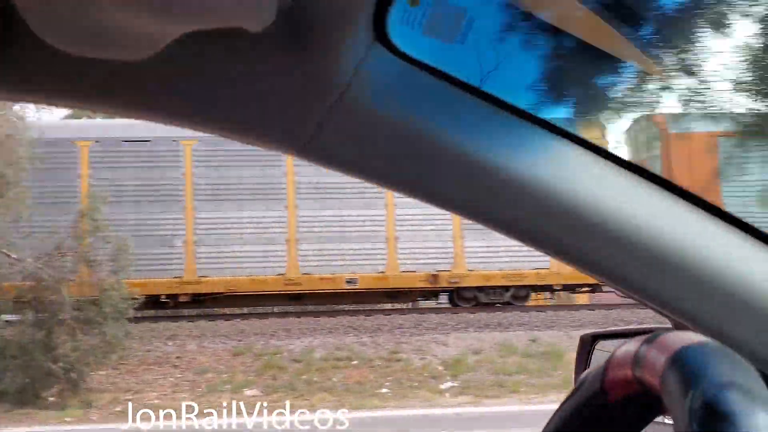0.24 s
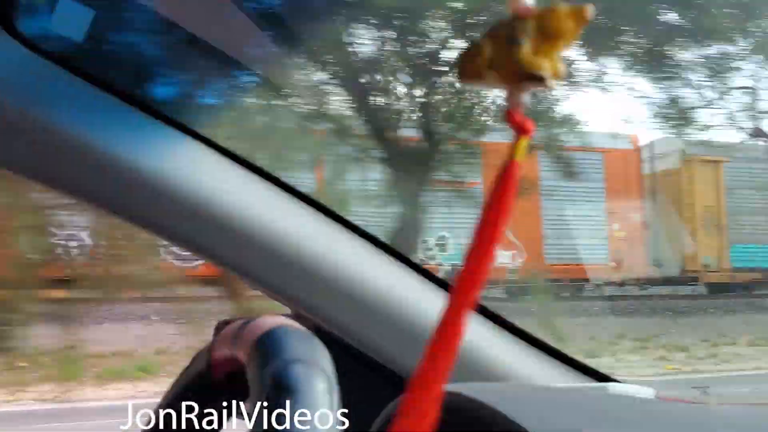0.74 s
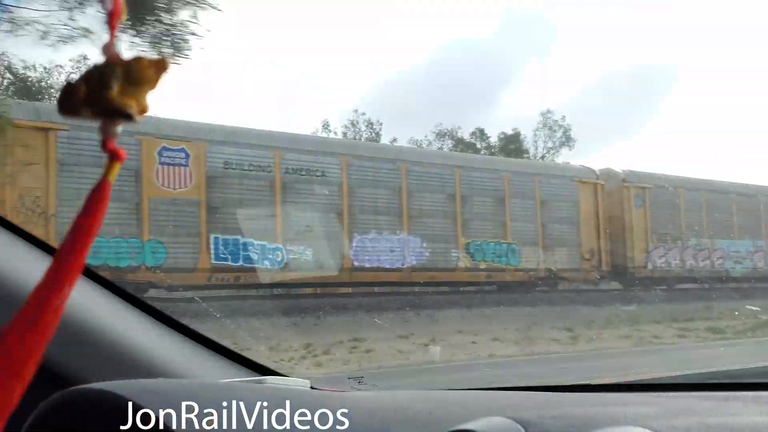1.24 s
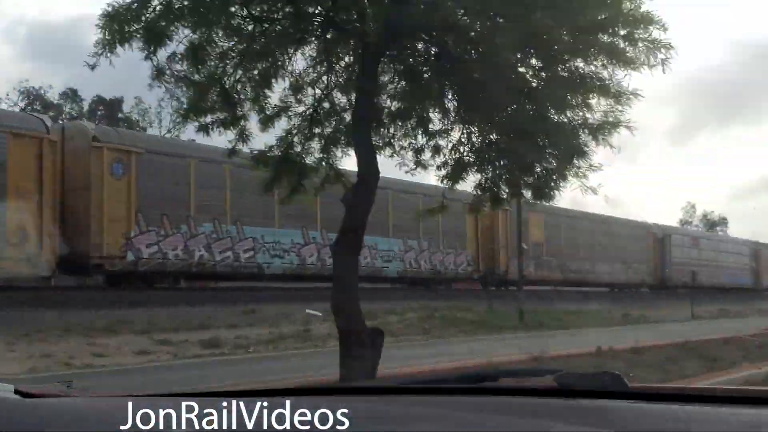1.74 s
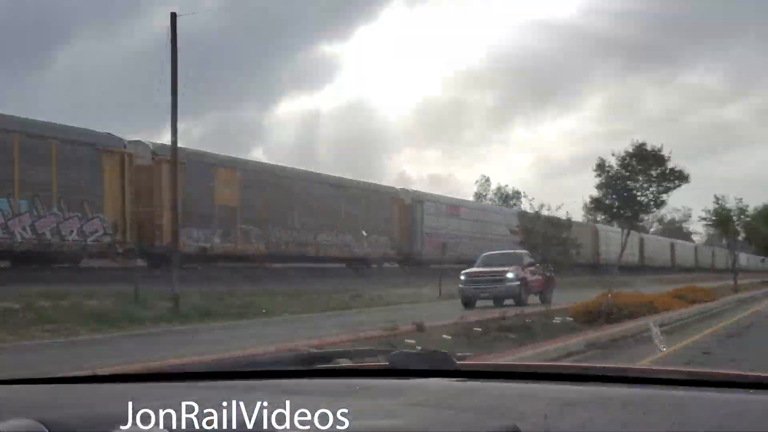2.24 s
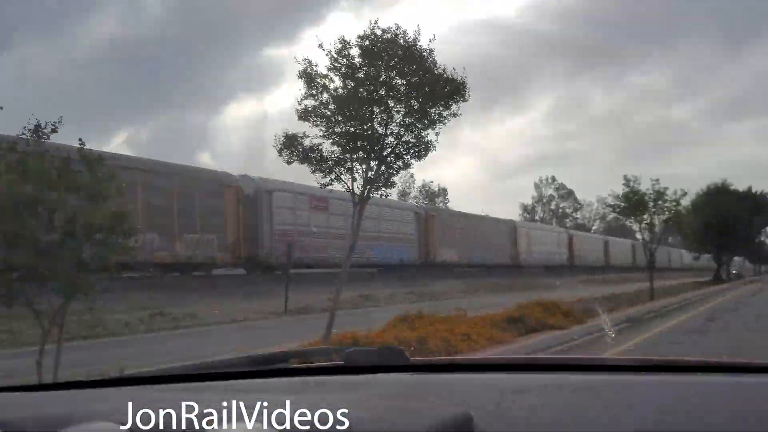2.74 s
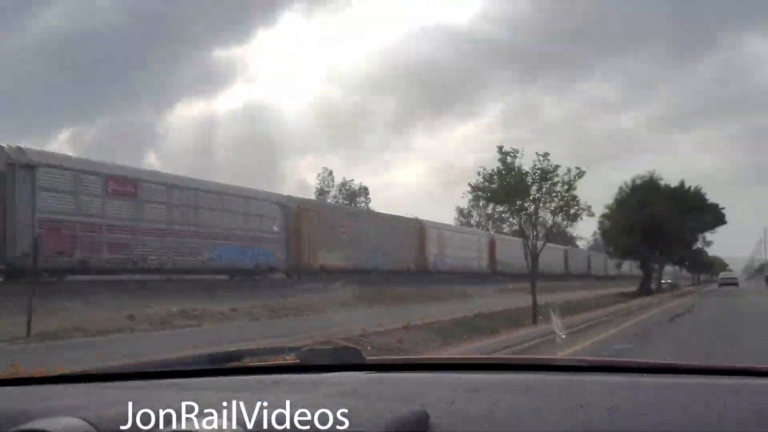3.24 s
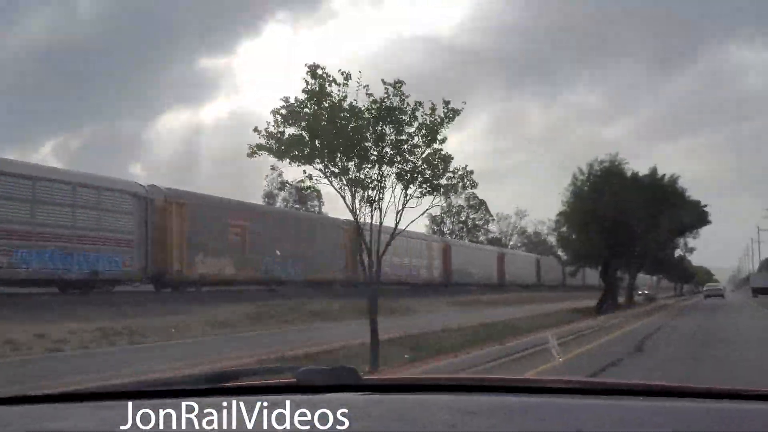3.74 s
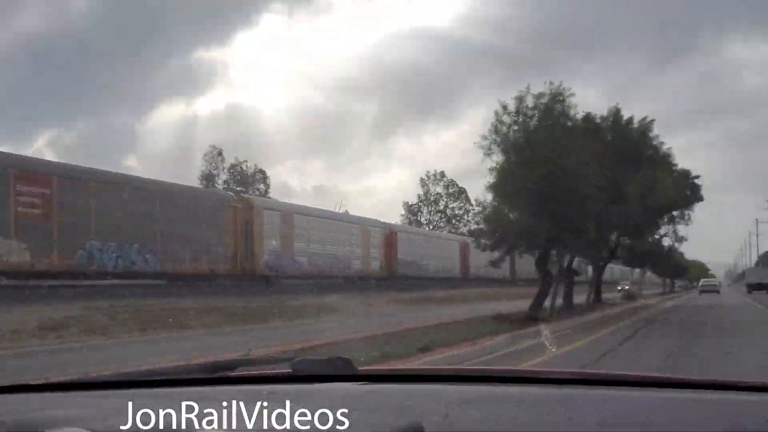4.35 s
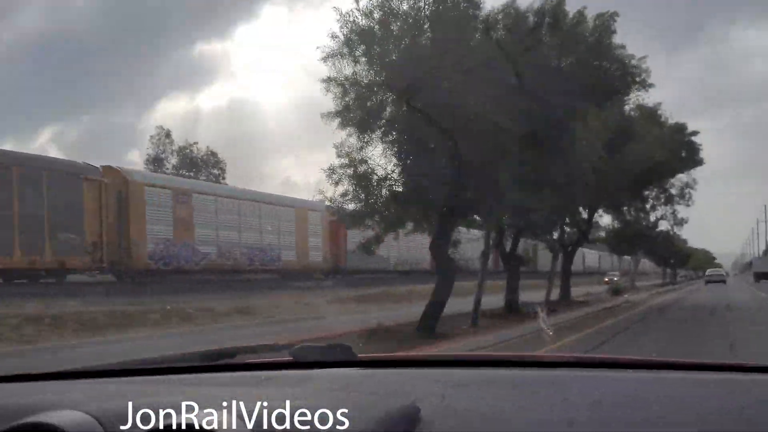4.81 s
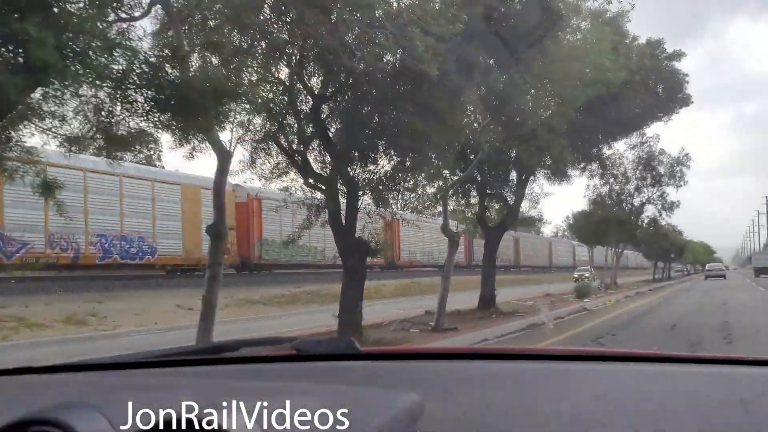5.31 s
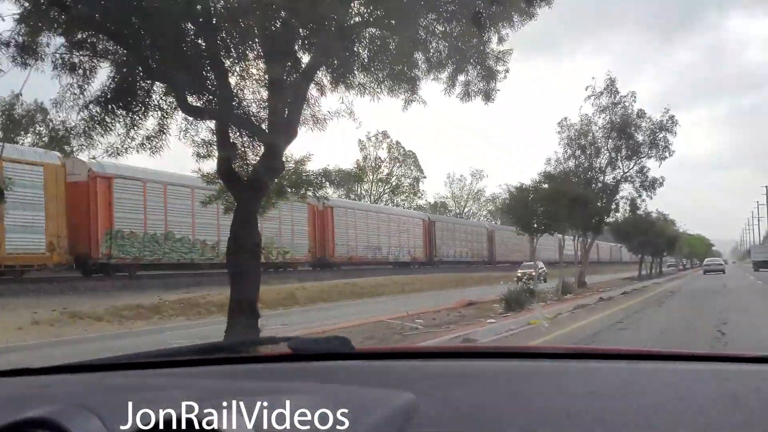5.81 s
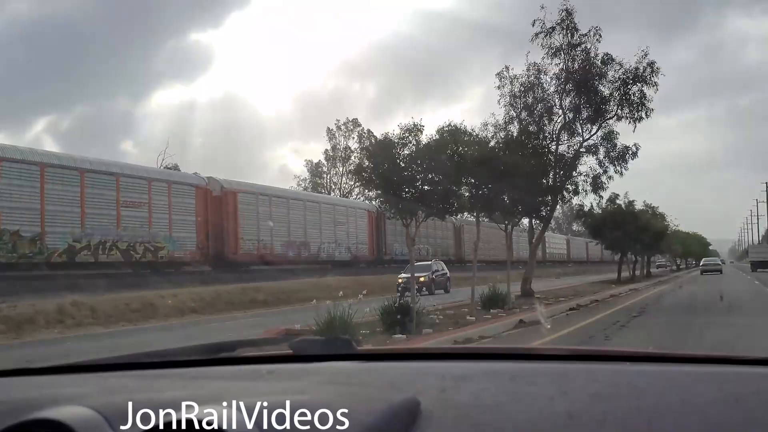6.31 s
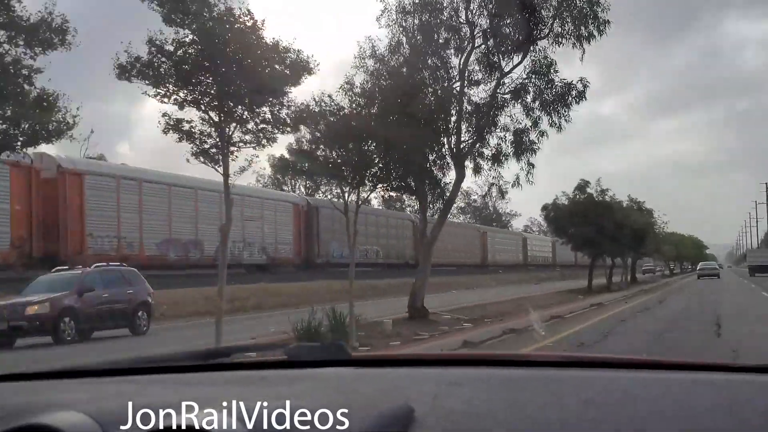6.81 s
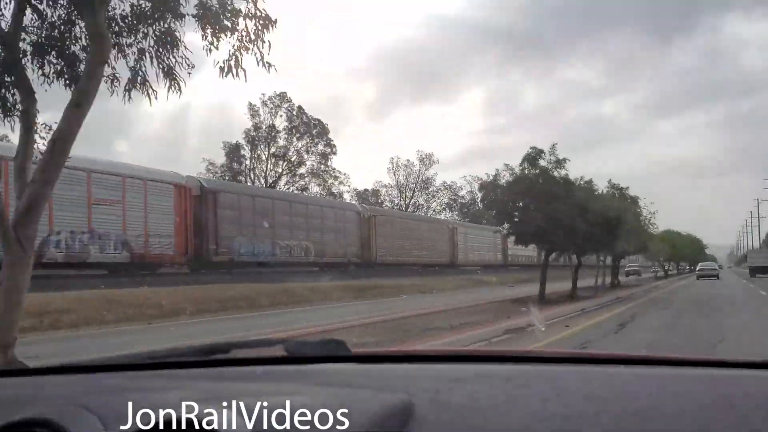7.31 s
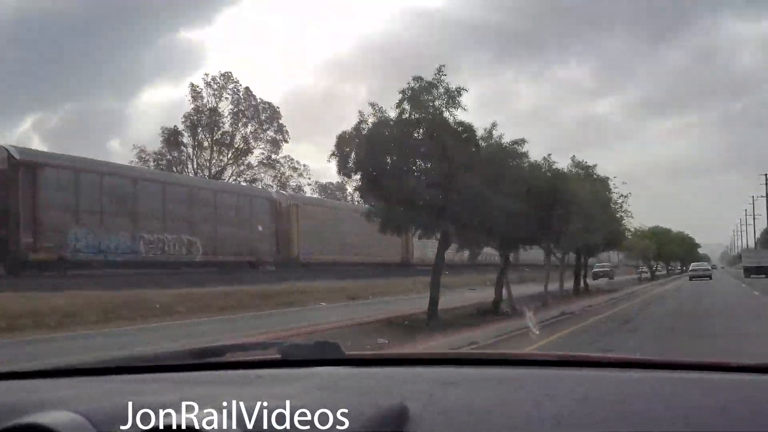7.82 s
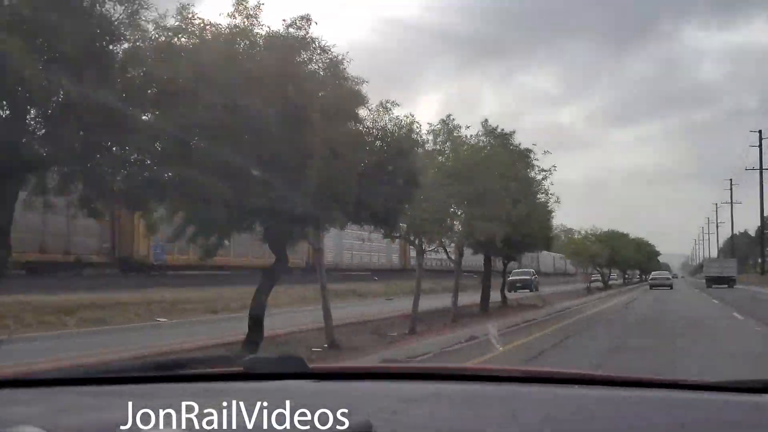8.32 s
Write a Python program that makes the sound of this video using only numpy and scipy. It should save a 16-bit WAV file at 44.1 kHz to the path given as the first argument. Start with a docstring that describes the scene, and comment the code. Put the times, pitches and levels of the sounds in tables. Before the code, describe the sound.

A low, uneven road rumble inside a moving car, with tyre drone, rushing wind, jingling keys and oncoming cars swishing by.

```python
"""A low, uneven boom fills a moving car: road bumps and wheel drops shake three cabin resonances.
Tyres drone through the floor, hum through the doors and hiss through the glass; wind rushes past and
swells as two oncoming cars swish by. Keys jingle over bumps, plastic trim ticks, a tyre thumps on cracks.
The hand-held stereo microphone turns from the door to the front, and cloth or hand rubs near its ports."""
import sys
import numpy as np
from scipy import signal
from scipy.fft import rfft, irfft, next_fast_len
from scipy.io import wavfile
from scipy.ndimage import uniform_filter1d, map_coordinates

SR = 44100
rng = np.random.default_rng(int(sys.argv[2]) if len(sys.argv) > 2 else 0)


def store_wav(level_fs):
    """Save 16-bit WAV to argv[1]."""
    pcm = np.round(np.clip(np.atleast_2d(level_fs), -1, 1) * 32767)
    wavfile.write(sys.argv[1], SR, pcm.T.astype(np.int16))


N = 377488

# Each row: centre in Hz, width in Hz, level in dB.
CABIN_MODES = [(51.4, 18.6, -28.5), (92.8, 38, -29), (123.1, 32.2, -30.5)]
# Rough and smooth road. Each row: centre and half length in seconds, swell in dB of each cabin mode.
ROAD_STRETCHES = [(.27, 0.065, 6.5, -2.5, -11), (1.3, 0.52, 1.5, 2, 2.5), (1.66, 0.085, 4, 8.5, 0),
                  (1.88, 0.13, 2.5, 12, 7), (2.08, 0.043, 4, -7, 9.5), (2.22, 0.035, -3, 2, -9),
                  (2.43, 0.13, 7.5, 10.5, 6), (2.62, 0.079, 10, -0.5, 2.5), (3.1, 0.38, -1.5, 2, -1),
                  (4.1, 0.23, -0.5, -2.5, -3.5), (4.52, 0.12, 0.5, 3, 4), (4.82, 0.074, 4.5, 3.5, -0.5),
                  (5.15, 0.06, 5.5, -2, 0.5), (5.62, 0.12, -1, 2, 0.5), (5.85, 0.053, 5, -3, 8),
                  (6.15, 0.13, 2.5, -1, 4.5), (6.55, 0.33, 5, 0.5, 0.5), (6.75, 0.086, -9, 4.5, 3.5),
                  (7.2, 0.14, 5.5, 1, 4.5), (7.55, 0.12, 1, 5.5, 4.5), (7.9, 0.26, 2.5, 2, 1),
                  (8.3, 0.1, 5.5, 1, 6.5), (8.43, 0.024, 2, -3, -1)]


def cabin_boom(shake_db, bump_db=2, bumps_per_s=14):
    """Random road input rings each cabin resonance; its strength follows the road surface."""
    out = 0
    for (hz, width_hz, level_db), road_db in zip(CABIN_MODES, shake_db):
        db = level_db + road_db + bump_db * wobble(bumps_per_s)
        resonance = lambda f: np.abs(hz * width_hz / (hz * hz - f * f + 1j * f * width_hz))
        ring = noise(lambda f: resonance(f) ** 2.38 * f ** 2 / (f ** 2 + 30 ** 2), patchy_db=-2.0)
        envelope = np.sqrt(np.abs(uniform_filter1d(ring.mean(0) ** 2, size=4000))) + 0.068
        out = out + amp(db) * unit(ring / envelope ** 0.99)  # fed without pause, it seldom falls silent
    return out


# Each row: start in seconds, blow in dB on the low, middle and upper cabin mode.
WHEEL_DROPS = [(2.35, -28.5, -19, -12), (2.422, -17, -3, -11), (2.466, -14, -7, -9.5),
               (8.226, -17, -4.5, -9), (8.327, -7.5, -16, -28.5)]


def wheel_thuds(rise_s=0.0049):
    """A dropping wheel strikes the cabin resonances; the wider ones die faster."""
    out, t = np.zeros(N + SR), np.arange(SR // 4) / SR
    for start_s, *blows_db in WHEEL_DROPS:
        for (hz, width_hz, _), db in zip(CABIN_MODES, blows_db):
            envelope = np.exp(-np.pi * width_hz * t) * (1 - np.exp(-t / rise_s))
            out[round(start_s * SR):][:len(t)] += amp(db) * envelope * np.sin(2 * np.pi * hz * t)
    return out[:N]


# Each row: frequency in Hz, relative density in dB.
DRONE_SPECTRUM = [(82, -23.5), (140, -3.5), (161, -8), (199, -8.5), (238, -15.5), (340, -14), (387, -17.5),
                  (418, -13.5), (454, -22.5), (482, -18.5), (580, -33.5), (750, -62), (1280, -120)]


def tyre_drone(shake_db, floor_db, level_db=-36.5):
    """Tyres drone through the floor, following the two upper cabin resonances."""
    drone = noise(colour(DRONE_SPECTRUM), patchy_db=0.5)
    drone = lift(drone, floor_db, centre_hz=292, width_hz=33)
    return amp(level_db + 0.16 * sum(shake_db[1:]) + 0.79 * wobble(9)) * drone


# Each row: frequency in Hz, relative density in dB.
HUM_SPECTRUM = [(400, -20), (560, -2.5), (700, -3), (1050, -2.5), (1180, -25), (1500, -55)]


def tyre_hum(swell_db, door_db, floor_db, level_db=-43.5):
    """Tyres hum through the doors and dash."""
    hum = noise(through_panels(HUM_SPECTRUM), patchy_db=1.0)
    hum = lift(hum, door_db, centre_hz=693, width_hz=103)
    hum = lift(hum, floor_db, centre_hz=546, width_hz=70)
    return amp(level_db + swell_db + 0.35 * wobble(5.5)) * hum


# Each row: frequency in Hz, relative density in dB.
TREAD_SPECTRUM = [(660, -18), (1120, -3.5), (1250, 1), (1490, -6), (1790, -6), (1940, -7.5), (2310, -8.5),
                  (2490, -11), (2770, -7.5), (3300, -27), (4290, -58), (7260, -120)]


def tyre_tread(swell_db, glass_db, level_db=-45.5):
    """Tread noise comes through the glass."""
    tread = noise(through_panels(TREAD_SPECTRUM), patchy_db=0.97)
    return amp(level_db + swell_db) * lift(tread, glass_db, centre_hz=1230, width_hz=51)


# Each row: start in seconds, level in dB.
ROAD_CRACKS = [(1.238, -34), (5.583, -31), (8.203, -26)]
# Each row: frequency in Hz, level in dB, T60 in seconds.
FLOOR_MODES = [(300, -3, .07), (500, 0, .08), (716, 0, .08), (880, -4, .06)]


def tyre_thumps(rise_s=0.002):
    """A tyre slaps a crack: a dull knock rings the hollow floor pan."""
    out, t = np.zeros(N + SR), np.arange(SR // 8) / SR
    for start_s, db in ROAD_CRACKS:
        ring = sum(amp(mode_db + rng.normal(0, 1.5) - 60 * t / t60) * np.sin(2 * np.pi * hz * t)
                   for hz, mode_db, t60 in FLOOR_MODES)
        out[round(start_s * SR):][:len(t)] += amp(db) * (1 - np.exp(-t / rise_s)) * ring
    return out[:N]


# Each row: start in seconds, level in dB, ring centre in Hz, ring breadth in octaves.
KEY_CONTACTS = [(1.918, -56, 12550, .02), (1.925, -53, 5860, .03), (1.94, -58, 8620, .02),
                (1.955, -58, 12550, .02), (1.965, -50, 5860, .03), (1.99, -48, 5860, .03),
                (2.01, -52, 5860, .03), (2.015, -59, 11300, .03), (2.103, -51, 6200, .35),
                (2.115, -47, 5800, .05), (2.127, -50, 4700, .1), (2.13, -59, 8500, .04),
                (2.162, -54, 9400, .03), (2.18, -54, 9400, .03), (2.21, -58, 8400, .03),
                (2.257, -46, 10500, .45), (2.258, -47, 12170, .03), (2.272, -45, 11120, .03),
                (2.273, -40, 5600, .2), (2.276, -42, 8400, .1), (2.29, -46, 5610, .04),
                (2.297, -43, 8400, .1), (2.305, -47, 9400, .04), (2.315, -51, 11120, .03),
                (2.32, -47, 8400, .3), (2.33, -50, 9400, .04), (2.335, -52, 12170, .03),
                (2.352, -42, 8350, .06), (2.36, -49, 9500, .08), (2.368, -42, 4600, .04),
                (2.385, -50, 8350, .03), (2.41, -56, 12170, .03), (2.415, -55, 9400, .05),
                (2.474, -52, 9800, .4), (2.476, -42, 5860, .04), (2.48, -40, 4880, .05),
                (2.49, -51, 10900, .04), (2.51, -50, 9400, .06), (2.51, -41, 5450, .04),
                (2.54, -50, 4800, .1), (2.6, -56, 13300, .02), (2.625, -53, 13300, .02),
                (2.65, -50, 5500, .1), (2.655, -54, 11750, .03), (2.70, -50, 11750, .03),
                (3.16, -55, 10900, .04), (3.5, -56, 9900, .06), (8.125, -54, 9650, .04),
                (8.155, -54, 9650, .03), (8.17, -57, 11700, .03), (8.30, -52, 11700, .04),
                (8.33, -52, 11500, .05), (8.36, -53, 11700, .04), (8.385, -51, 11200, .1),
                (8.42, -50, 11750, .03), (8.435, -54, 10200, .15), (8.45, -49, 11750, .03),
                (8.48, -52, 11750, .03), (8.51, -53, 11750, .03), (8.535, -53, 11700, .03)]
# Each row: frequency in Hz, level in dB, T60 in seconds.
KEY_MODES = [(4600, -4, .08), (4870, -6, .15), (5500, -7, .1), (5610, -1, .16), (5850, -5, .1),
             (6440, -9, .12), (7470, -14, .12), (8215, -12, .12), (8350, -5, .19), (8420, -9, .14),
             (8620, -10, .1), (9400, -6, .13), (9650, -7, .11), (10900, -8, .14), (11120, -5, .11),
             (11350, -8, .1), (11780, -6, .13), (12170, -6, .16), (12550, -8, .1), (13300, -9, .09),
             (14300, -12, .08)]


def key_jingle(rise_s=0.005, scrape_t60_s=0.2):
    """Keys scrape and ring the modes near each contact's centre; loose contact makes the pitch tremble."""
    out, t = np.zeros(N + SR), np.arange(SR // 4) / SR
    for start_s, db, centre_hz, octaves in KEY_CONTACTS:
        ring = 0
        for hz, mode_db, t60 in KEY_MODES:
            tremble = np.cumsum(0.085 * rng.standard_normal(len(t)))
            near_db = -6 * (np.log2(hz / centre_hz) / octaves) ** 2
            pitch_hz = hz * (1 + .002 * rng.normal())
            envelope = amp(mode_db + near_db + rng.normal(0, 2) - 60 * t / t60)
            ring = ring + envelope * np.sin(2 * np.pi * pitch_hz * t + tremble)
        scrape = uniform_filter1d(rng.standard_normal(len(t)), size=7) * np.sin(2 * np.pi * centre_hz * t)
        scrape *= (.35 + 1.5 * octaves) * amp(-60 * t / scrape_t60_s)
        out[round(start_s * SR):][:len(t)] += amp(db) * (ring + scrape) * (1 - np.exp(-t / rise_s))
    return out[:N]


# Each row: start in seconds, crack level in dB, knock level in dB.
TRIM_SLIPS = [(1.183, -40, -40), (1.672, -56, -48), (2.948, -56, -35), (3.989, -55, -46), (5.370, -55, -44),
              (5.801, -58, -48), (7.959, -35, -31)]


def trim_ticks(crack_t60_s=0.01, knock_t60_s=0.03):
    """Plastic trim slips: a short bright crack and a woody knock."""
    cracks, knocks, t = np.zeros(N + SR), np.zeros(N + SR), np.arange(SR // 30) / SR
    ring = sum(gain * np.sin(2 * np.pi * hz * t) for hz, gain in [(1550, 1), (1850, 0.9), (2300, 0.4)])
    for start_s, crack_db, knock_db in TRIM_SLIPS:
        start = round(start_s * SR)
        cracks[start:][:len(t)] += amp(crack_db - 60 * t / crack_t60_s) * rng.standard_normal(len(t))
        knocks[start:][:len(t)] += amp(knock_db - 60 * t / knock_t60_s) * ring
    return filtered(cracks[:N], lambda hz: 1 / (1 + (9500 / (hz + 1)) ** 6)) + knocks[:N]


# Each row: centre in seconds, wind swell in dB, half length in seconds, swish level in dB.
ONCOMING_CARS = [(2.915, 4.5, 0.055, -41.5), (7.26, 2, 0.15, -41)]
# Each row: frequency in Hz, relative density in dB.
SWISH_SPECTRUM = [(400, -30), (750, 9), (1100, -11), (1800, -10), (2400, -18), (2900, -7), (3300, -21),
                  (6000, -31), (8000, -44)]


def traffic_swish(crest_hz=4860, crest_width_hz=900, crest_db=-16.5):
    """Tyre noise of oncoming cars rises and falls; a bright crest trails each one."""
    t = np.arange(N) / SR
    sweep = crest = 0
    for centre_s, _, half_s, db in ONCOMING_CARS:
        position = (t - centre_s) / half_s
        sweep += amp(db) * np.exp(-np.abs(position) ** 3)
        crest += amp(db + crest_db) * np.exp(-((position - 0.7) / 0.45) ** 2)
    return (sweep * noise(colour(SWISH_SPECTRUM), patchy_db=3.0)
            + crest * noise(bell(crest_hz, crest_width_hz), patchy_db=2.5))


# Each row: frequency in Hz, relative density in dB.
WIND_SPECTRUM = [(1820, -20), (3100, 2), (3430, 1.5), (3770, 1), (4390, -3.5), (6010, -4), (7500, -16),
                 (9750, -33.5), (16500, -120)]


def wind(swell_db, bright_db, level_db=-57):
    """Air rushes past the glass, brighter towards the front."""
    air = noise(colour(WIND_SPECTRUM), patchy_db=0.96)
    treble = filtered(air, lambda hz: 1 / (1 + (4600 / (hz + 1)) ** 12))
    return amp(level_db + swell_db) * (air + (amp(bright_db) - 1) * treble)


# Each row: frequency in Hz, relative density in dB.
HISS_SPECTRUM = [(4290, -6), (7300, -9), (8480, 1), (11500, -5), (15000, -22), (22000, -120)]


def air_hiss(swell_db, bright_db, level_db=-68.5):
    """The faint top of the air noise opens up towards the front."""
    return amp(level_db + swell_db + 1.47 * bright_db) * noise(colour(HISS_SPECTRUM), patchy_db=0.9)


# Each row: frequency in Hz, relative density in dB.
RUSTLE_SPECTRUM = [(7500, -31), (9300, -8.5), (11000, -3.5), (12500, -0.5), (14900, 1.5), (15900, 0)]
# Each row: centre in seconds, swell in dB, half length in seconds.
RUBS = [(.16, -1, .05), (.4, -1, 0.08), (1.0, 7, .15), (2.3, 5, .05), (2.5, 7, .03), (2.92, 9, 0.076),
        (3.17, 6, 0.055), (3.49, 5, .07), (4.34, 3.5, 0.13), (6.2, 1, .06), (6.86, 6.5, .07), (7.22, 5, .1),
        (8.15, 5, 0.035), (8.42, 5, .07)]


def rustle(swell_db, level_db=-68):
    """Cloth or hand rubs near the microphone ports."""
    return amp(level_db + swell_db + swells(RUBS)) * noise(colour(RUSTLE_SPECTRUM), patchy_db=0.9)


# Each row: centre in Hz, width in Hz, gain in dB.
PANEL_MODES = [(640, 50, 6.5), (647.5, 19, -21), (700, 99, 5), (805, 36, 5), (981, 23, -8), (982, 59, 7.5),
               (1066, 34, 7), (1126, 51, -3), (1158, 20, 5.5), (1585, 7.1, 9.5), (2506, 68, 5.5),
               (2930, 83, 3)]


def through_panels(spectrum):
    """Response of a spectrum coloured by panel resonances and hollows."""
    panel_db = lambda f: sum(db / (1 + (2 * (f - hz) / width) ** 2) for hz, width, db in PANEL_MODES)
    return lambda f: amp(along(spectrum, f) + panel_db(f))


# Each row: frequency in Hz, left minus right in dB.
STEREO_BALANCE = [(60, -1.5), (140, -1), (210, -2.5), (330, -0.5), (500, -1), (770, -2), (1170, -6.5),
                  (1790, -2.5), (2740, 3), (4190, -4.5), (6410, -16.5), (9000, -19), (12300, -4.5),
                  (14000, -15), (15500, -22)]
# Each row: frequency in Hz, left phase lead in radians.
STEREO_PHASE = [(430, 0), (1030, 0.45), (1460, 2.5), (1980, 3.5), (2840, 6)]


def sides(hz):
    """Left and right level and timing by frequency; the highest treble sits to the right."""
    half = np.array([.5, -.5])[:, None]
    return amp(half * along(STEREO_BALANCE, hz)) * np.exp(1j * half * along(STEREO_PHASE, hz))


# Each row: frequency in Hz, left-right coherence.
STEREO_COHERENCE = [(60, 0.99), (140, 1), (210, 0.75), (330, 0.99), (500, 0.69), (770, 0.84), (1000, 0.47),
                    (1250, 0.53), (1790, 0.52), (2740, 0.19), (4200, 0.061), (15000, .05)]


def noise(response, patchy_db):
    """Stereo noise whose mid signal follows the response, with patches of random gain."""
    spectrogram = signal.stft(rng.standard_normal((2, N)), nperseg=512)[2]
    patches = uniform_filter1d(rng.standard_normal(spectrogram.shape[1:]), size=6, axis=0)
    patches = uniform_filter1d(patches, size=10, axis=1)
    pair = signal.istft(spectrogram * amp(patchy_db * patches / patches.std()), nperseg=512)[1][:, :N]
    size = next_fast_len(N + 8192)
    hz = np.fft.rfftfreq(size, 1 / SR)
    coherence = np.clip(along(STEREO_COHERENCE, hz), 0, 1)
    angle = np.arccos(coherence) / 2
    common, opposed = rfft(pair, size) * np.array([np.cos(angle), np.sin(angle)])
    left, right = sides(hz)
    mid = np.sqrt(abs(left) ** 2 + abs(right) ** 2 + 2 * coherence * (left * right.conj()).real) / 2
    stereo = np.array([left * (common + opposed), right * (common - opposed)])
    return unit(irfft(stereo * response(hz) / mid, size)[:, :N])


def amp(db):
    return 10 ** (np.asarray(db) / 20)


def unit(x):
    """Scale the mean of the channels to rms 1."""
    return x / np.sqrt(np.mean(np.atleast_2d(x).mean(0) ** 2) + 1e-20)


def along(points, hz):
    """Interpolate (Hz, value) points on a log axis."""
    knots_hz, values = np.transpose(points)
    return np.interp(np.log(hz + 1), np.log(knots_hz + 1), values)


def colour(spectrum):
    return lambda hz: amp(along(spectrum, hz))


def bell(centre_hz, width_hz):
    return lambda hz: np.exp(-((hz - centre_hz) / width_hz) ** 2)


def filtered(x, response):
    size = next_fast_len(N + 8192)
    return irfft(rfft(x, size) * response(np.fft.rfftfreq(size, 1 / SR)), size)[..., :N]


def lift(x, db, centre_hz, width_hz):
    """Boost or cut one band."""
    return x + (amp(db) - 1) * filtered(x, bell(centre_hz, width_hz))


def curves(rows):
    """One value per sample for each column after the time."""
    times_s, *columns = np.transpose(rows)
    return [np.interp(np.arange(N) / SR, times_s, column) for column in columns]


def wobble(knots_per_s):
    """Smooth random curve."""
    knots = rng.standard_normal(int(N * knots_per_s / SR) + 4)
    return map_coordinates(knots, [np.arange(N) * knots_per_s / SR])


def swells(rows):
    """Sum of flat-topped swells in dB."""
    t = np.arange(N) / SR
    return sum(db * np.exp(-((t - centre_s) / half_s) ** 4) for centre_s, db, half_s in rows)


# Noise reaching the cabin. Each row: time in seconds, flow and hum in dB, used about their means.
NOISE_DRIFT = [(0.0, -50, -42), (0.52, -49, -46), (0.71, -46, -42.5), (1.67, -46, -45.5),
               (1.74, -48, -41.5), (1.84, -49, -44.5), (2.38, -48.5, -45.5), (2.81, -48.5, -45),
               (2.98, -47.5, -41), (3.1, -49.5, -42), (4.39, -48.5, -43), (4.58, -47, -42),
               (5.36, -48.5, -43.5), (5.63, -48.5, -42.5), (6.98, -45.5, -41.5), (7.18, -45.5, -38.5),
               (7.29, -43, -40), (7.51, -46.5, -41), (8.54, -46.5, -42), (8.56, -51.5, -39.5)]
# Microphone turning from door to front. Each row: time in seconds, then gain in dB of
# wind treble, door band, floor bands and glass band.
MIC_FACING = [(0, -10, -5, 2.5, -7), (.6, -7.5, 6, 5, -5), (1.2, -5, 5, 3.5, -5.5), (2, -1, 4, -1, 0.5),
              (2.5, 4, 8.5, 0.5, -12), (3.2, 1.5, 0, -2, -1), (4.3, 0, 0.5, 0.5, 4), (5.45, 0.5, 0, 2, 0.5),
              (5.65, 1, 6, -1.5, 0), (5.9, 1.5, 2, 1, -1), (7, 1, -0.5, 3.5, 0), (8.56, 3, 1, 0.5, -2)]


def scene():
    """Road and wind noise, fluttered by shared gusts, plus impacts panned by frequency."""
    impacts = key_jingle() + trim_ticks() + tyre_thumps() + wheel_thuds()
    impacts = filtered(impacts, lambda hz: 2 * np.abs(sides(hz)) / np.abs(sides(hz)).sum(0))
    centres_s, halves_s, *modes_db = np.transpose(ROAD_STRETCHES)
    shake_db = [swells(zip(centres_s, db, halves_s)) for db in modes_db]
    boom = cabin_boom(shake_db)
    flow_db, hum_db = [curve - curve.mean() for curve in curves(NOISE_DRIFT)]
    bright_db, door_db, floor_db, glass_db = curves(MIC_FACING)
    passing_db = swells(row[:3] for row in ONCOMING_CARS)
    gust = 2 * np.tanh(0.26 * wobble(7) + 0.5 * wobble(15) + 0.64 * wobble(28))
    return (boom + impacts + traffic_swish()
            + tyre_drone(shake_db, floor_db)
            + tyre_hum(hum_db + 0.26 * passing_db, door_db, floor_db)
            + tyre_tread(flow_db + 0.14 * passing_db + 0.31 * gust, glass_db)
            + wind(0.94 * flow_db + passing_db + 0.93 * gust, bright_db)
            + air_hiss(flow_db + 1.2 * passing_db + 1.3 * gust, bright_db)
            + rustle(flow_db + 1.3 * gust))


def record(dry):
    """Band limit at 15.8 kHz."""
    return filtered(dry, lambda hz: hz < 15800)


dry = scene()
out = record(dry)
store_wav(out)
```